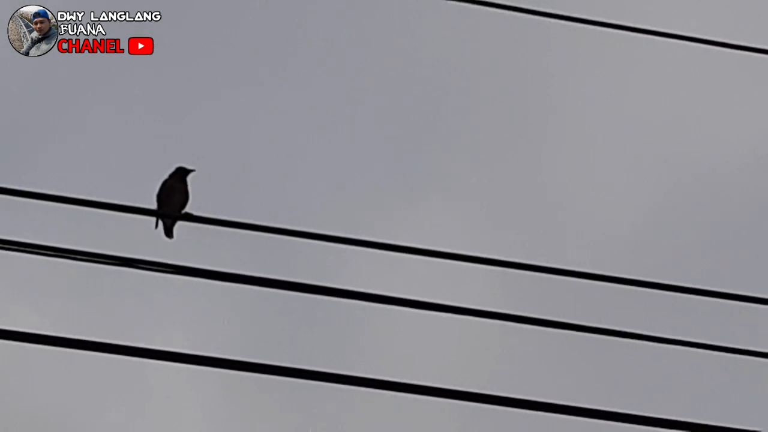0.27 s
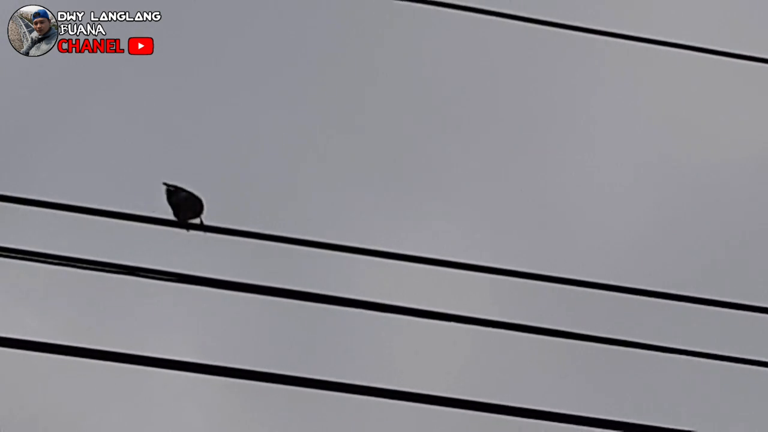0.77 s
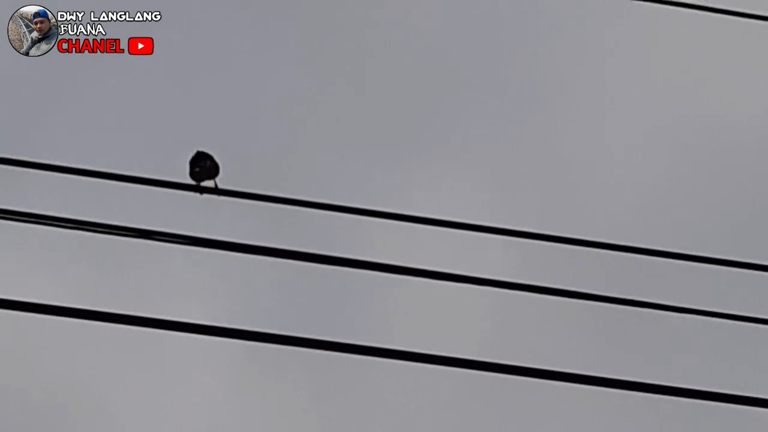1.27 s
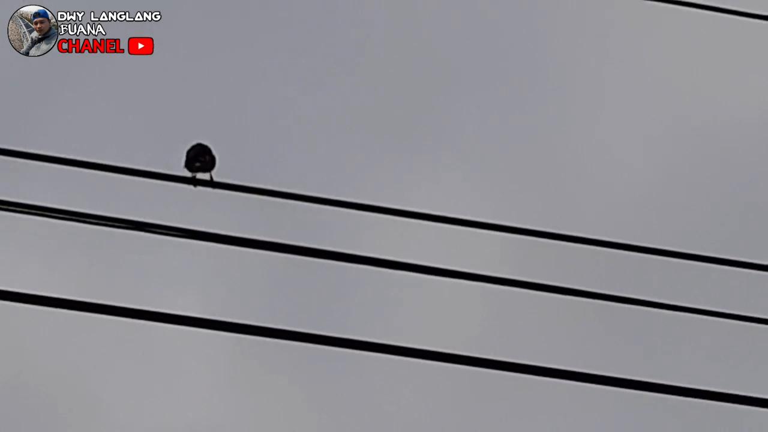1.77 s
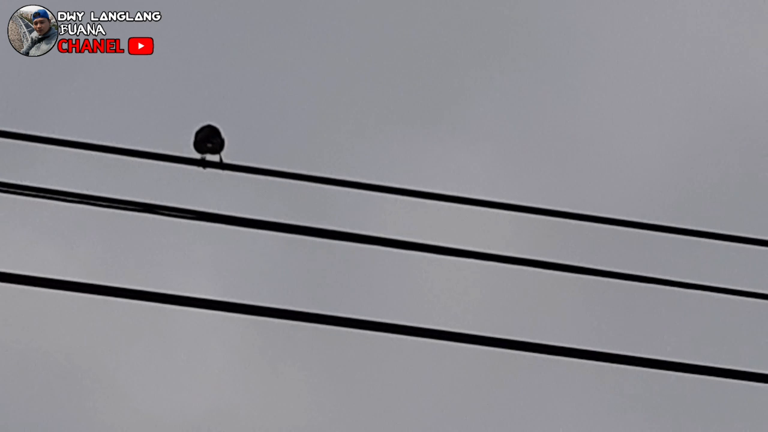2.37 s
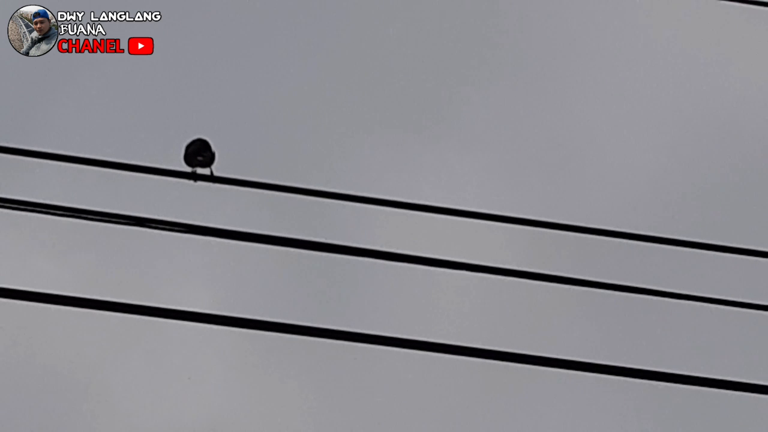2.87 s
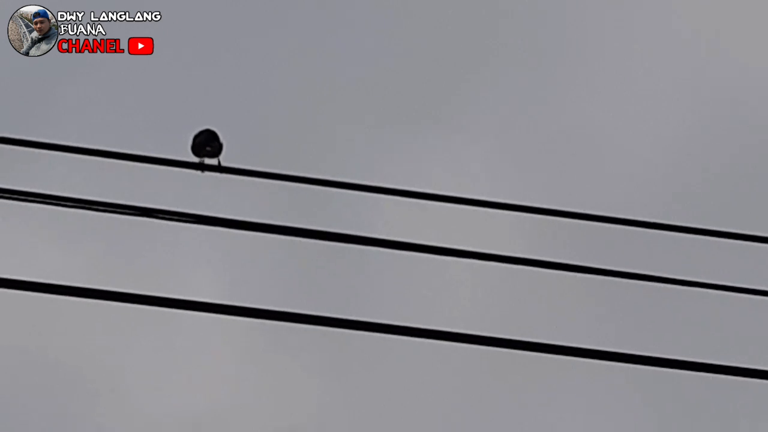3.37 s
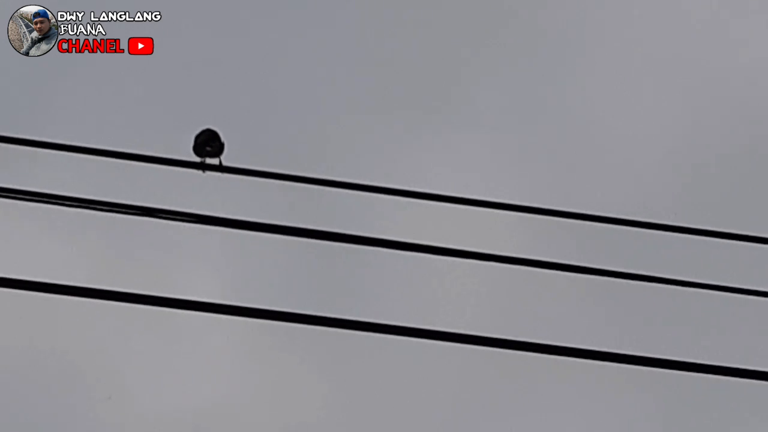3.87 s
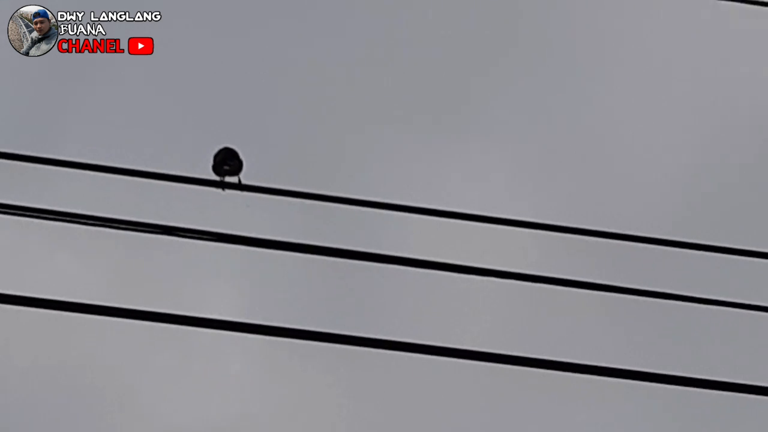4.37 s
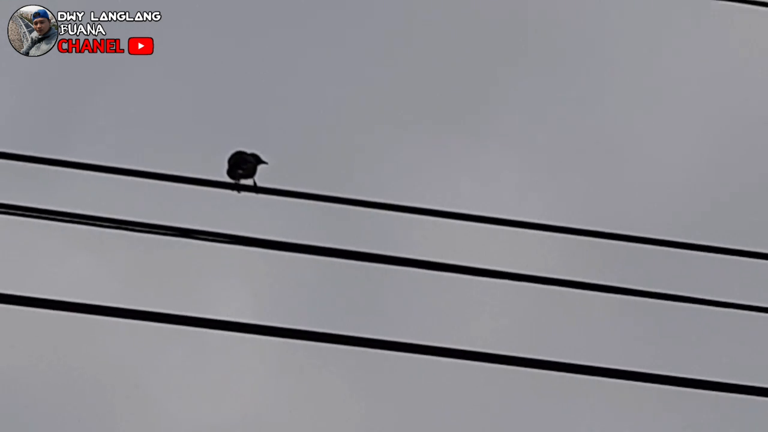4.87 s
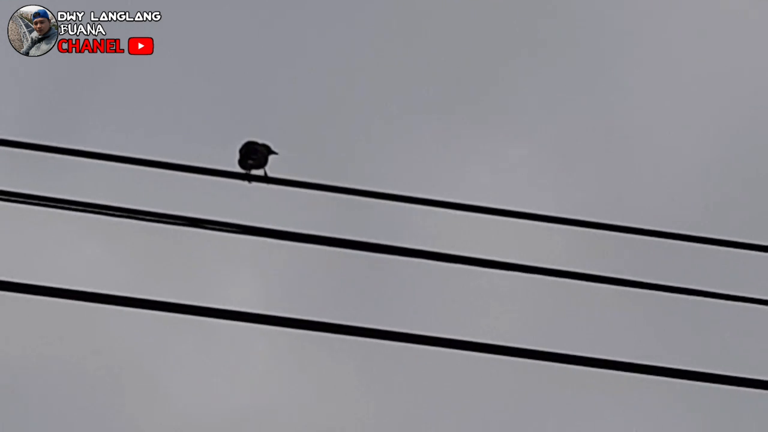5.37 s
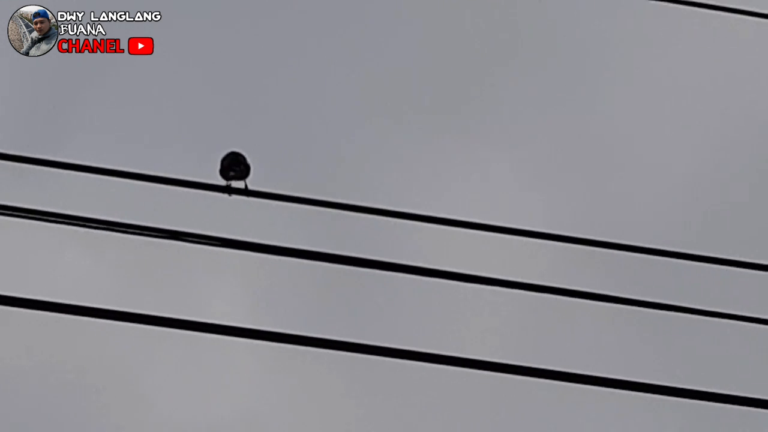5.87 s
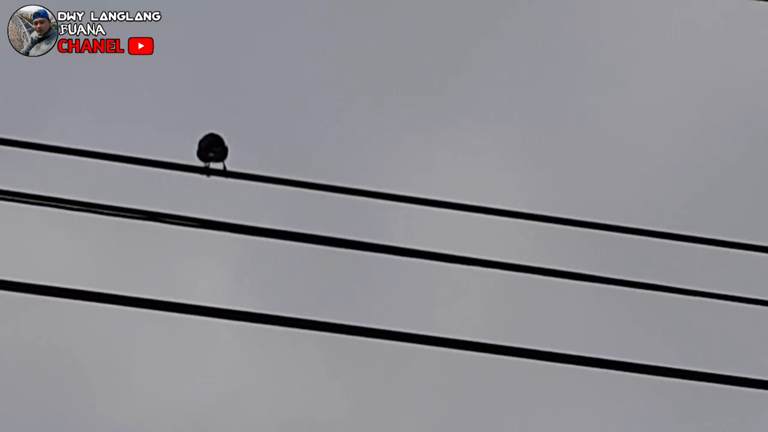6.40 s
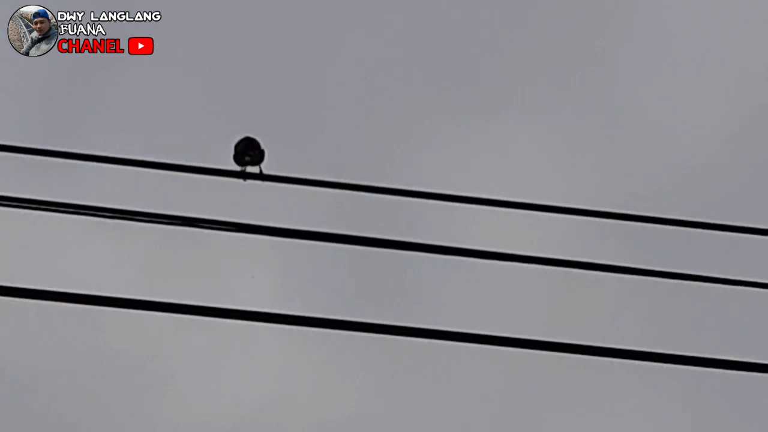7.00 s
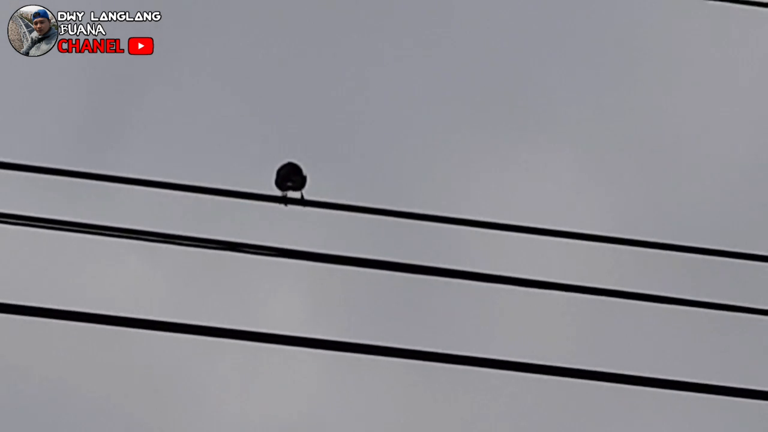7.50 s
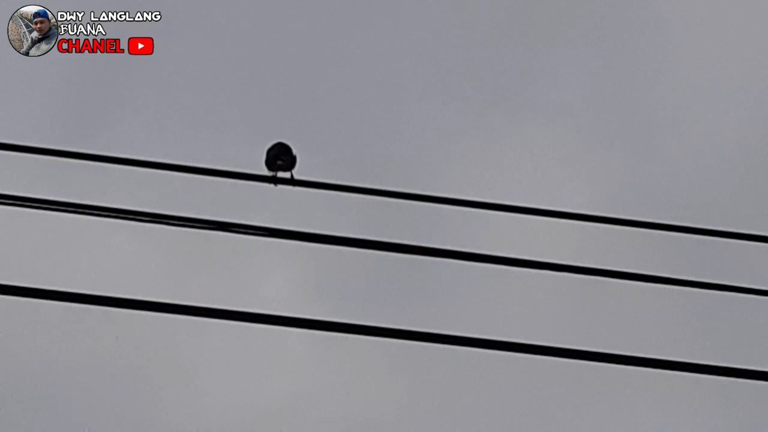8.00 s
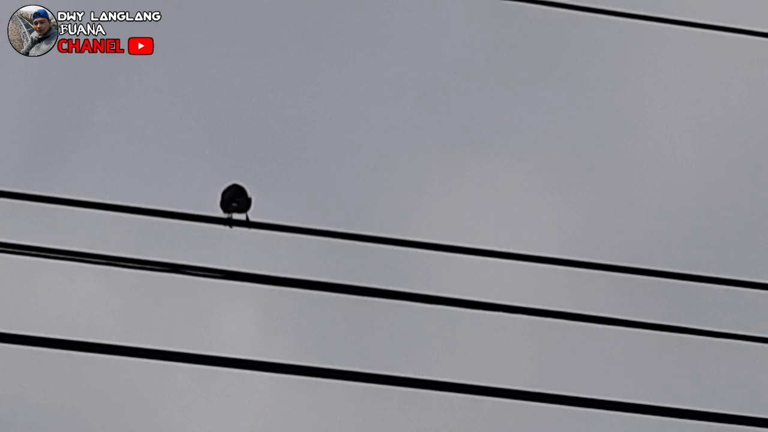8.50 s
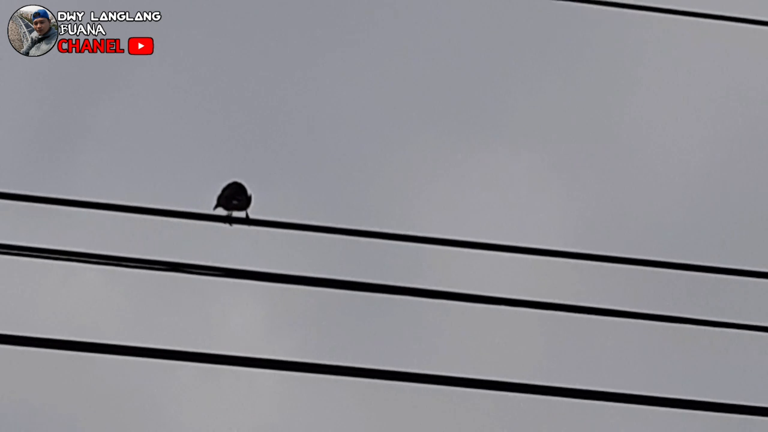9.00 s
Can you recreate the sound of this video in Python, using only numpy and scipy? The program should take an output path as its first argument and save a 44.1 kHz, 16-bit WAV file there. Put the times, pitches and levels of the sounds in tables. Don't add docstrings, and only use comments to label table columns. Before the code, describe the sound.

Steady, soft traffic roar and low rumble fill an open town street, caught by a small stereo camera. At 0 s a dull rattling knock fades within a fraction of a second; a faint far chirp follows. At 0.5 s a starling overhead gives a thin whistle and short falling trill. Near 1.1, 1.6 and 2.1 s come very quick chirps leaping up and dropping sharply, each followed by a fast pulsing trill sinking into a buzz, with short wall echoes. From 2.7 to 5 s the bird rests; leaves rustle in small gusts, strongest around 4.2 s, and distant birds chirp faintly near 3.8 and 4.6 s. Squeaky, arched, two-voiced calls come at 5.8 and 6.55 s, then five level warbling trills from 6.9 to 8 s, stepping slightly lower. Meanwhile a low engine hum with tyre noise grows, swelling strongest from 8 s to the end at about 9.25 s.

```python
import sys
import numpy as np
from scipy import signal
from scipy.fft import rfft, irfft, next_fast_len
from scipy.io import wavfile
from scipy.ndimage import uniform_filter1d, map_coordinates

SR = 44100
rng = np.random.default_rng(int(sys.argv[2]) if len(sys.argv) > 2 else 0)


def to_wav(sig):
    pcm = np.clip(np.atleast_2d(sig), -1, 1) * 32767
    pcm = np.round(pcm).astype(np.int16)
    wavfile.write(sys.argv[1], SR, pcm.T)


def gain_from_db(level_db):
    decades = np.asarray(level_db, float) / 20
    return 10 ** decades


N = 407925


def starling():
    # t/s, f/Hz of strongest partial, level/dB
    rise = [(0, 1785, -49), (.015, 2194, -42), (.025, 2724, -35.5), (.031, 3460, -26.5), (.036, 4150, -40)]
    drop = [(.037, 4405, -39), (.043, 4964, -38), (.051, 4390, -43.5), (.056, 3277, -18), (.066, 3240, -22),
            (.071, 2750, -21), (.078, 2250, -25.5), (.088, 2187, -28.5), (.097, 1390, -48)]
    # t/s, f/Hz, level/dB
    lead = [(0, 3404, -32.5), (.006, 3900, -32), (.013, 4410, -39)]
    whistle = [(.011, 3570, -36), (.02, 3517, -27), (.029, 3410, -27.5), (.035, 3100, -31)]
    # t/s, f/Hz, level/dB
    sinking = [(.034, 3016, -29), (.053, 2874, -26), (.083, 2724, -27.5), (.113, 2590, -27.5),
               (.138, 1890, -30.5), (.158, 1417, -38.5), (.173, 1004, -53.5)]
    # t/s, f/Hz, level/dB
    opening = [
        [(.535, 3540, -46), (.55, 3630, -34.5), (.562, 3550, -33)],
        [(.563, 2854, -38), (.6, 2697, -35), (.64, 2573, -36), (.668, 2375, -30.5), (.686, 2175, -30),
         (.702, 2240, -31.5)],
    ]
    # time of a dip/s, rate/Hz, drift/(Hz/s)
    opening_beat = (.579, 64.37, 62)
    # t/s, pitch factor, level/dB, lead of the rise/s
    chirps = [
        (1.121, 0.99, -2, 0.00053),
        (1.568, 1, 0, .0005),
        (2.062, .985, -3.2, .005),
    ]
    # t/s, pitch factor, level/dB, delay to a dip/s, warble f/Hz
    sinkers = [
        (1.259, 1.03, .4, .052, 53.5),
        (1.707, .98, .5, .05, 56.3),
        (2.199, .995, -.8, .049, 56.8),
    ]
    # t/s, crest f/Hz, length/s, delay to a dip/s, warble f/Hz
    holders = [
        (6.884, 2850, .164, .049, 75.3),
        (7.114, 2730, .161, .053, 76.2),
        (7.335, 2660, .171, .054, 75.1),
        (7.564, 2510, .172, .05, 73.4),
        (7.799, 2470, .174, .0495, 72.6),
    ]
    # fork t/s, fan length/s, fork f/Hz, arch height, last swell/dB
    arches = [
        (5.801, .022, 2734, 1.02, -1),
        (6.552, .059, 2910, 0.49, 9.5),
    ]
    warbles = {"opening": (.024, .33, .08, 7, -10, 12, -9), "sinking": (.003, .3, -.015, 12, -14, 16, -14),
               "holding": (.004, .35, .01, 7, -18, 12, -1.5)}
    # multiple of the pitch, level/dB
    rise_parts = [(2 / 3, -2), (0.95, 0), (4 / 3, -0.68), (7 / 3, -17.5), (8 / 3, -17.5)]
    drop_parts = [(.5, -19.5), (1, 0), (2, -1), (3, -17)]
    lead_parts = [(.5, -10), (1, 0), (3 / 2, -0.64), (1.981, -11)]
    pure_parts = [(1, 1), (2, 5.5), (3, -3)]
    trill_parts = [(1, 3), (2, -11.5), (3, -9)]
    # f/Hz, level/dB
    breath = [(900, -41), (1600, -4), (2600, -5.5), (3800, -1.5), (5000, -11), (8000, -10), (9500, -26),
              (13000, -21), (15000, -39)]

    voice = np.zeros((2, N))
    sing(voice, opening[0], pure_parts, breath_db=-10.5)
    sing(voice, opening[1], trill_parts, -18, opening_beat, warbles["opening"])
    for s, factor, db, early in chirps:
        sing(voice, sung(rise, s - early, factor, db), rise_parts, breath_db=-7, rough_db=1.8)
        fall = sung(drop, s, factor, db)
        fall[:2, 0] -= early
        sing(voice, fall, drop_parts, breath_db=-12)
    for s, *_ in sinkers + holders:
        sing(voice, sung(lead, s), lead_parts, breath_db=-3)
        sing(voice, sung(whistle, s), pure_parts, breath_db=-12)
    for s, factor, db, dip_s, rate in sinkers:
        crest = sung(sinking, s, factor, db)
        sing(voice, crest, trill_parts, -18, (s + dip_s, rate, 0), warbles["sinking"])
    for s, crest_hz, length, dip_s, rate in holders:
        crest = sung(holding(crest_hz, length), s)
        sing(voice, crest, trill_parts, -18, (s + dip_s, rate, 0), warbles["holding"])
    for call in arches:
        arched(voice, *call)
    hiss = rush(breath, alike=0.12, lag_ms=0, patchy_db=4.5)
    return voice[0], uniform_filter1d(voice[1], size=600) * hiss


def sing(voice, line, parts, breath_db, beat=None, warble=None, rough_db=0):
    # f/Hz, level/dB
    throat = [(1000, -15), (2000, 4.5), (3500, 6), (4600, -11.5), (5600, -10), (7000, -19), (8500, -10.5),
              (10000, -18), (15000, -31)]
    s, hz, db = np.transpose(line)
    t = s[0] + np.arange(round((s[-1] - s[0]) * SR)) / SR
    glide = uniform_filter1d(np.interp(t, s, hz), size=130, mode="nearest")
    pitch = glide * (1 + 0.0082 * wobble(400.0, len(t)))
    edge = np.clip(np.minimum(t - s[0], s[-1] - t) / .002, 0, 1)
    flow = edge * gain_from_db(uniform_filter1d(np.interp(t, s, db), size=90, mode="nearest"))
    level = flow * gain_from_db((0.32 + rough_db) * wobble(255.0, len(t)))
    crest = pitch
    under = 0
    fray = 0.59 + 0.249 * wobble(511.0, len(t))
    if beat:
        dip_s, rate, drift = beat
        stop, share, lean, sharp, dip_db, brief, notch_db = warble
        turn = np.pi * (rate * (t - dip_s) + drift * (t - dip_s) ** 2 / 2)
        slackness = np.abs(np.cos(turn))
        depth = np.clip((s[-1] - stop - t) / .0135, 0, 1)
        buzz = depth * np.clip((2550 - crest) / 650, 0, .85)
        dip = share * (1 - buzz / 2) * slackness ** sharp + lean * np.sin(2 * turn)
        pitch = crest * (1 - depth * dip)
        pitch = pitch * (1 + notch_db / 200 * buzz * np.sin(turn) ** 6 + .04 * buzz * wobble(300, len(t)))
        beat_db = dip_db * slackness ** brief + notch_db * np.cos(turn - 1.05) ** 16
        level = level * unit(gain_from_db((depth - buzz / 2) * beat_db))
        rattle_hz = 160 + 35 * wobble(80, len(t))
        level = level * (1 + buzz * np.sin(2 * np.pi * np.cumsum(rattle_hz) / SR))
        slack_hz = crest * (.62 + .15 * (turn / np.pi % 1))
        under_level = depth * flow * (1 - buzz) * gain_from_db(-15.5 + 4 * wobble(350, len(t)))
        under = under_level * np.sin(2 * np.pi * np.cumsum(slack_hz) / SR)
    phase = 2 * np.pi * np.cumsum(pitch) / SR
    tone = 0
    for k, part_db in parts:
        colour_db = along(throat, k * crest) - along(throat, crest)
        tone = tone + gain_from_db(part_db + colour_db) * np.sin(k * phase) * (1 if k < 2 else fray)
    start = round(s[0] * SR)
    voice[0, start:start + len(t)] += np.sqrt(2) * (level * tone + under)
    voice[1, start:start + len(t)] += flow * gain_from_db(breath_db)


def sung(shape, s, factor=1, db=0):
    return np.multiply(shape, [1, factor, 1]) + [s, 0, db]


def holding(crest_hz, length):
    hold_s, settle_s, release_s = .033, 0.0305, 0.017
    s = np.array([hold_s, hold_s + settle_s, length - release_s, length])
    sag_hz = 660 * (s - length / 2)
    hz = (crest_hz - sag_hz) * [1.06, 1, 1, 0.92]
    swell_db = 72 * (s - s[0])
    return np.transpose([s, hz, -32.5 + swell_db + [0, 0, 0, -13.5]])


def arched(voice, s, fan_s, fork_hz, height, swell_db):
    # t/s and f/Hz from the fork, level/dB
    opening_fan = [(-.059, -870, -54), (-.046, -600, -43), (-.021, -400, -37), (0, 0, -28.5)]
    # t/s, f/Hz, level/dB
    upper = [(.012, 3420, -31), (.032, 3647, -29), (.037, 3890, -36), (.06, 4270, -43.5), (.078, 4300, -41),
             (.092, 3710, -37), (0.111, 3500, -40)]
    # t/s, f/Hz, level/dB
    lower = [
        [(.002, 2780, -39), (.02, 2270, -38), (.045, 1920, -47), (.082, 1790, -43.5)],
        [(.032, 2950, -37), (.065, 2700, -36), (.092, 2550, -44.5), (.108, 2380, -36)],
        [(.05, 3650, -52), (.075, 3520, -38), (.098, 3200, -45)],
        [(.002, 5750, -45), (.015, 5800, -50.5), (.036, 5650, -54)],
    ]
    # multiple of the pitch, level/dB
    fan_parts = [(0.98, 0), (3 / 2, 0.2), (1.8, 1.9), (3, -8.5), (7 / 2, -8)]
    arch_parts = [(1, 4.5), (2, -1.5), (3, -4)]
    before, offset_hz, fan_db = np.transpose(opening_fan)
    times = np.linspace(-fan_s, 0, num=8)
    fan_hz = fork_hz + np.interp(times, before, offset_hz)
    stretched_db = np.interp(times / fan_s * -before[0], before, fan_db)
    sing(voice, np.transpose([times + s, fan_hz, stretched_db]), fan_parts, breath_db=-11)
    arch = np.array([(0, fork_hz, -40)] + upper)
    arch[:, 1] -= (1 - height) * np.maximum(arch[:, 1] - 3586, 0)
    arch[-2:, 2] += swell_db
    sing(voice, sung(arch, s), arch_parts, breath_db=-15)
    for shape in lower:
        sing(voice, sung(shape, s), [(0.97, 0)], breath_db=-9.5)


def street(x, tail_db):
    # f/Hz, t60/s
    decay = [(1500, 0.38), (3000, 1), (8000, 0.8)]
    # delay t/s, left level/dB, right level/dB
    walls = [(.0085, -12, -12), (.017, -17, -17), (.033, -25, -23), (.041, -26, -24), (.0545, -30, -28),
             (.133, -19, -17)]
    # f/Hz, level/dB
    dull = [(3200, 0), (4000, -7), (5500, -5), (8000, -4)]
    hz, t, z = signal.stft(rng.standard_normal((2, SR // 2)), SR, nperseg=256)
    tail = signal.istft(z * gain_from_db(-60 * t / along(decay, hz)[:, None]), SR, nperseg=256)[1]
    answer = gain_from_db(tail_db) * tail / np.linalg.norm(tail[0])
    for delay, *db in walls:
        scatter = rng.standard_normal((2, 24)) * np.hanning(24)
        scatter = scatter / np.linalg.norm(scatter, axis=1)[:, None]
        answer[:, round(delay * SR):][:, :24] += gain_from_db(db)[:, None] * scatter
    dulled = filtered(x, lambda hz: gain_from_db(along(dull, hz)))
    return signal.fftconvolve(dulled[None], answer, axes=1)[:, :N]


def knock():
    # t/s, level/dB, t60/s
    bump = (.008, -41, .3)
    # f/Hz, level/dB per Hz
    rattle = [(200, -30), (450, -3), (780, 0), (1100, -10), (3500, -20), (6000, -34), (9000, -70)]
    s, db, t60 = bump
    t = np.arange(N) / SR - s
    decay = (t > 0) * gain_from_db(db - 60 * np.abs(t) / t60)
    return decay * rush(rattle, alike=.6, lag_ms=.2, patchy_db=1.5)


def engines():
    # t/s, firing f/Hz, level/dB
    firing = [(0, 45.75, -52), (2.5, 45.79, -43.5), (4.5, 46.33, -45), (5.5, 45.48, -41.5),
              (6.5, 45.35, -42), (7.7, 45.47, -38.5), (8.2, 45.88, -38), (8.5, 45.63, -34),
              (8.9, 46.08, -31), (9.25, 47.46, -29)]
    # multiple of the firing rate, level/dB
    firing_orders = [(1, -20), (2, 1), (3, 0), (4, -3), (5, -7.5), (6, -8.5), (7, -15.5), (8, -14.5),
                     (9, -21), (10, -16)]
    # t/s, f/Hz, level/dB
    motor = [(0, 55.9, -48.5), (1.8, 56, -50), (2.3, 56.5, -62), (3.6, 56.57, -47), (4.5, 55.7, -57),
             (9.25, 56.1, -49)]
    hz, db = curves(firing)
    phase = 2 * np.pi * np.cumsum(hz * (1 + 0.0035 * wobble(6))) / SR
    orders = 0
    for k, level in firing_orders:
        orders = orders + gain_from_db(level + 2.9 * wobble(5)) * np.sin(k * phase + rng.uniform(0, 2 * np.pi))
    hum_hz, hum_db = curves(motor)
    hum = np.sin(2 * np.pi * np.cumsum(hum_hz) / SR)
    return gain_from_db(db - 1.5) * orders + gain_from_db(hum_db + 5.0 + 2.8 * wobble(4.287)) * hum


def traffic():
    # t/s, level/dB
    approach = [(0, 1), (2.5, 0), (4.2, 0.9), (4.6, 2), (6.1, 5.5), (7.5, 8), (8.1, 10), (8.7, 12),
                (9.25, 13.5)]
    # far level/dB, growth/(dB per dB of approach)
    road = [
        (-38, 0.39),
        (-51, 1.1423),
        (-64, 0.9557),
        (-77.5, 2),
    ]
    # t/s, width/s, level added to the hiss/dB
    gusts = [
        (2.76, 0.018, 6),
        (2.97, 0.018, 1.5),
        (3.43, .03, 1),
        (3.93, 0.041, 5.5),
        (4.19, 0.08, 7),
        (4.6, 0.15, 5),
        (4.9, 0.17, 3),
    ]
    # f/Hz, level/dB per Hz
    rumble_spectrum = [(15, -45.5), (25, -27), (75, -4.5), (107, 1.5), (145, -5.5), (221, -2.5), (403, -13),
                       (600, -15.5), (780, -34), (1320, -120)]
    tyre_spectrum = [(150, -64), (250, -20), (280, -12), (393, -15), (690, -4), (956, -4.5), (1520, -4.5),
                     (5000, -26.5), (6500, -49), (11000, -120)]
    roar_spectrum = [(530, -4.5), (900, 1), (1080, -4), (1170, -12.5), (1820, 0.5), (3050, -8.5),
                     (3370, -10), (5000, -22), (6500, -44), (11000, -120)]
    hiss_spectrum = [(2060, -45.5), (3500, -28), (4080, 0.5), (4740, -2.5), (7160, -0.5), (9240, -15),
                     (10000, -10.5), (13000, -19), (22000, -120)]
    spray_spectrum = [(4710, -48.5), (8000, 2.5), (9120, -3.5), (11600, 6), (13700, -3), (14900, 5),
                      (15800, -42)]
    near_db, = curves(approach)
    rumble_db, tyres_db, hiss_db, spray_db = (far_db + growth * near_db for far_db, growth in road)
    spray_db = spray_db - 2.5 * np.maximum(near_db - 11, 0)
    swell = wobble(2.397)
    t = np.arange(N) / SR
    gust_db = sum(db * np.exp(-((t - s) / width) ** 2) for s, width, db in gusts)

    rumble_level = gain_from_db(rumble_db - 2.5 + 2.3 * wobble(7.4))
    rumble = rumble_level * rush(rumble_spectrum, alike=0.96, lag_ms=0.24, patchy_db=0.3)
    tyres = gain_from_db(tyres_db + .5 * swell) * rush(tyre_spectrum, alike=0.53, lag_ms=0.27, patchy_db=0.66)
    roar_level = gain_from_db(-48 + 0.574 * gust_db + 0.2 * wobble(1.974))
    roar = roar_level * rush(roar_spectrum, alike=0.67, lag_ms=0.5146, patchy_db=1.5)
    hiss_level = gain_from_db(hiss_db + gust_db + 0.81 * swell)
    hiss = hiss_level * rush(hiss_spectrum, alike=0.24, lag_ms=0.516, patchy_db=2.88)
    spray_level = gain_from_db(spray_db + 0.73 * gust_db + 0.66 * swell)
    spray = spray_level * rush(spray_spectrum, alike=.3, lag_ms=0.51, patchy_db=-1.42)
    return rumble + tyres + roar + hiss + spray


def far_birds():
    # t/s, length/s, f/Hz, glide/Hz, level/dB
    calls = [(.225, .065, 3950, -300, -59), (3.76, .02, 5100, -130, -57.5), (3.8, .02, 4100, -1300, -57),
             (4.535, .03, 3220, 200, -55.5), (4.6, 0.035, 3970, 250, -53.5), (4.7, .045, 3900, -290, -53),
             (4.75, .04, 3700, -100, -55), (4.64, .05, 3680, 30, -58)]
    voice = np.zeros((2, N))
    for s, length, hz, glide, db in calls:
        edge_db = db - 12
        line = [(s, hz - glide / 2, edge_db), (s + length / 2, hz, db), (s + length, hz + glide / 2, edge_db)]
        sing(voice, line, [(1, 0)], breath_db=-9)
    return voice[0] * unit(1.5 + wobble(250))


def rush(spectrum, alike, lag_ms, patchy_db):
    z = signal.stft(rng.standard_normal((2, N)), nperseg=512)[2]
    field = uniform_filter1d(rng.standard_normal(z.shape[1:]), 6, 0)
    field = uniform_filter1d(field, 14, 1)
    pair = signal.istft(z * gain_from_db(patchy_db * unit(field)), nperseg=512)[1][:, :N]
    turn = np.arccos(np.clip(alike, -1, 1)) / 2
    ports = np.array([[np.cos(turn), np.sin(turn)], [np.cos(turn), -np.sin(turn)]]) @ pair

    def response(hz):
        return gain_from_db(along(spectrum, hz)) * np.exp(-2e-3j * np.pi * np.outer([lag_ms, 0], hz))

    return unit(filtered(ports, response))


def filtered(x, response):
    m = next_fast_len(N + SR // 2)
    return irfft(rfft(x, m) * response(np.fft.rfftfreq(m, 1 / SR)), m)[..., :N]


def wobble(rate, size=N):
    steps = np.arange(0, size + 16, 16)
    knots = rng.standard_normal(int(steps[-1] * rate / SR) + 4)
    return np.interp(np.arange(size), steps, map_coordinates(knots, [steps * rate / SR]))


def curves(rows):
    s, *cols = np.transpose(rows)
    return [np.interp(np.arange(N) / SR, s, c) for c in cols]


def along(points, hz):
    f, v = np.transpose(points)
    return np.interp(np.log(hz + 1), np.log(f + 1), v)


def unit(x):
    return x / np.sqrt(np.mean(x ** 2) + 1e-20)


def scene():
    # f/Hz, left minus right level/dB
    bird_side = [(4500, 4), (7500, 17), (12000, 1)]
    song, air = starling()
    others = far_birds()
    bird = filtered(song + air, lambda hz: gain_from_db(np.outer([.5, -.5], along(bird_side, hz))))
    echoes = street(bird[0] + 1.5 * others, tail_db=-14.5)
    return bird + echoes + others + knock() + engines() + traffic()


def low_pass(x):
    return signal.sosfilt(signal.butter(12, 16250, fs=SR, output="sos"), x)


def record(dry):
    # f/Hz, left minus right level/dB
    port_colour = [(60, -2), (110, 3.5), (200, -0.5), (380, 2), (700, 2.5), (1290, 6), (2380, 7),
                   (4400, -3.5), (8120, -3), (15000, 4)]
    ports = filtered(dry, lambda hz: gain_from_db(np.outer([.5, -.5], along(port_colour, hz))) * (hz < 15500))
    return low_pass(ports)


dry = scene()
out = record(dry)
to_wav(out)
```